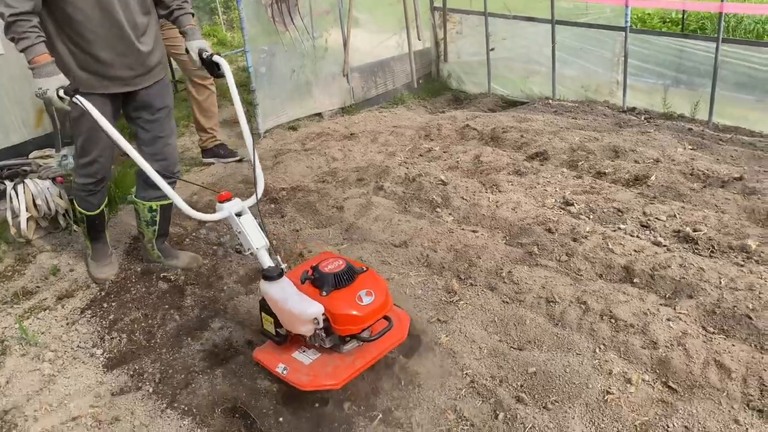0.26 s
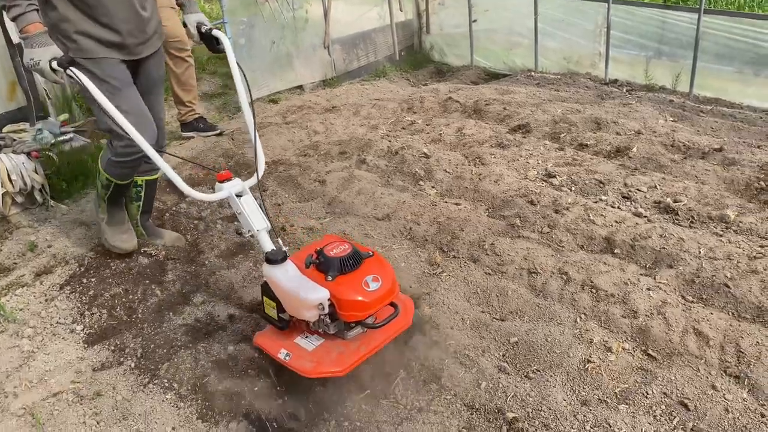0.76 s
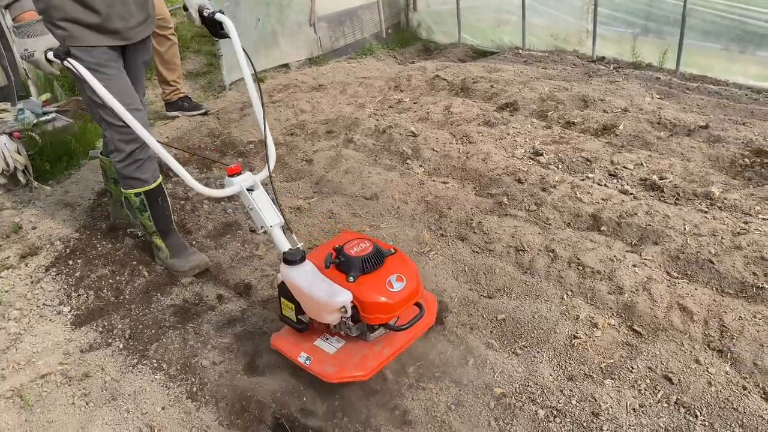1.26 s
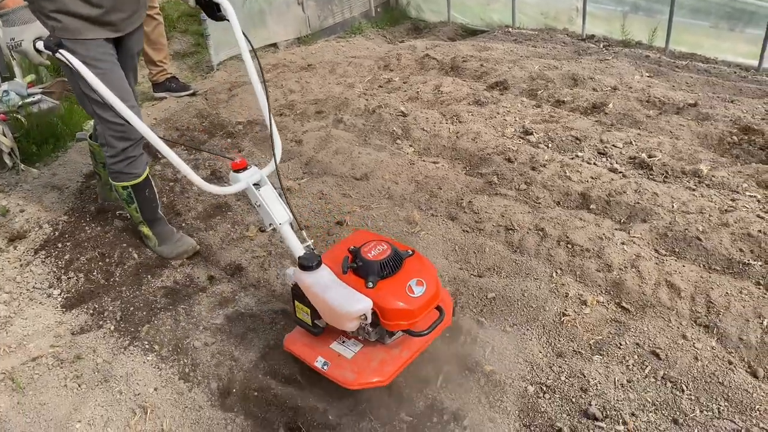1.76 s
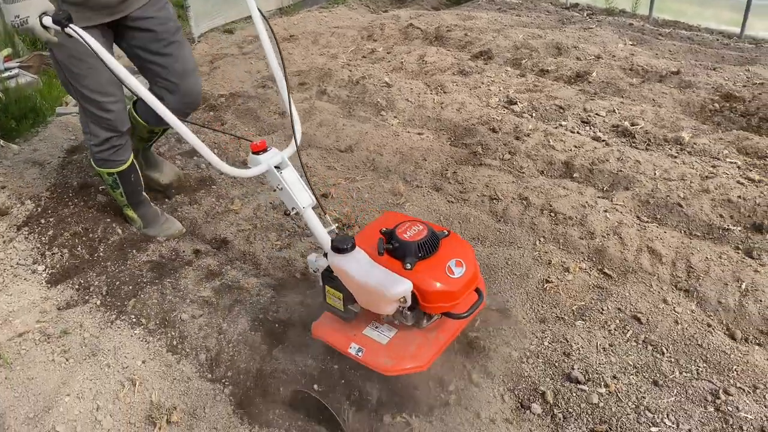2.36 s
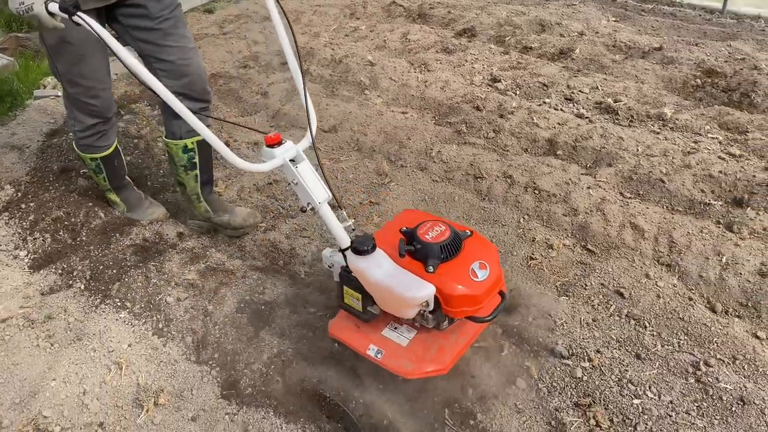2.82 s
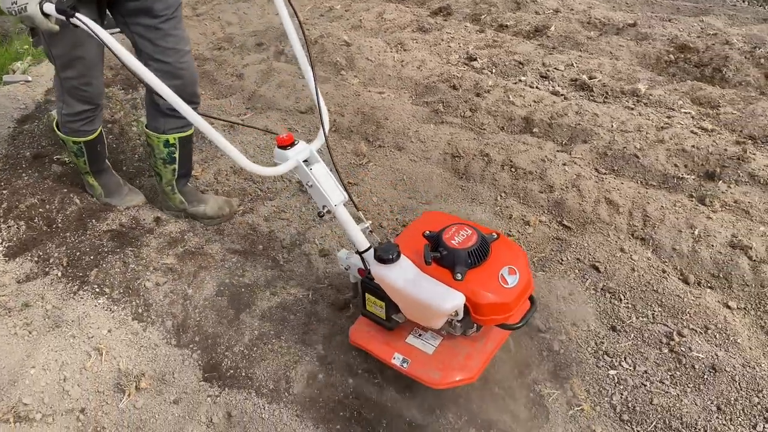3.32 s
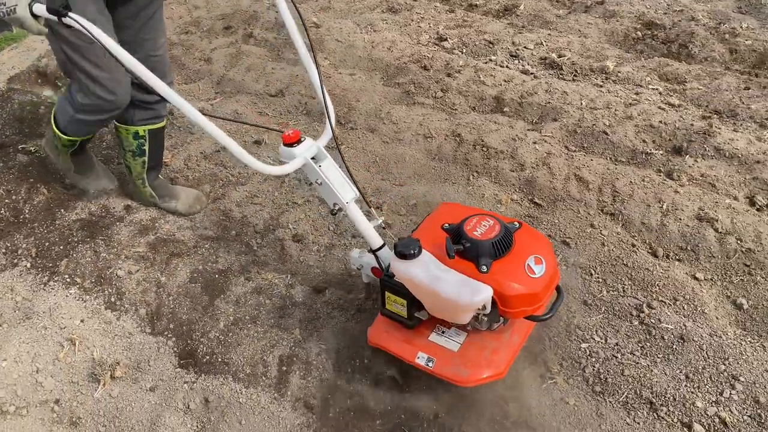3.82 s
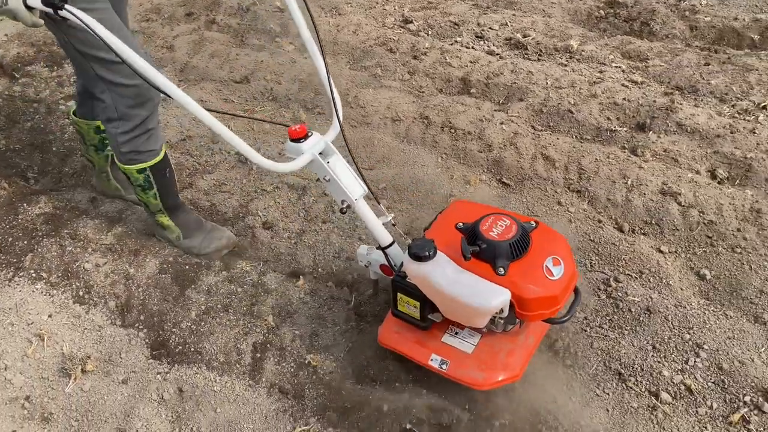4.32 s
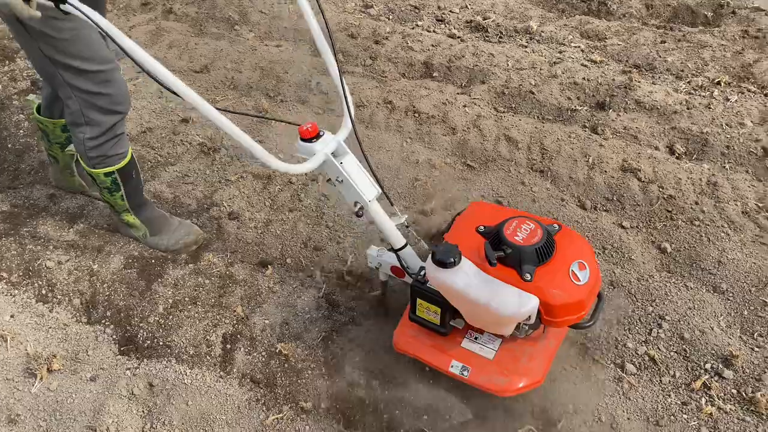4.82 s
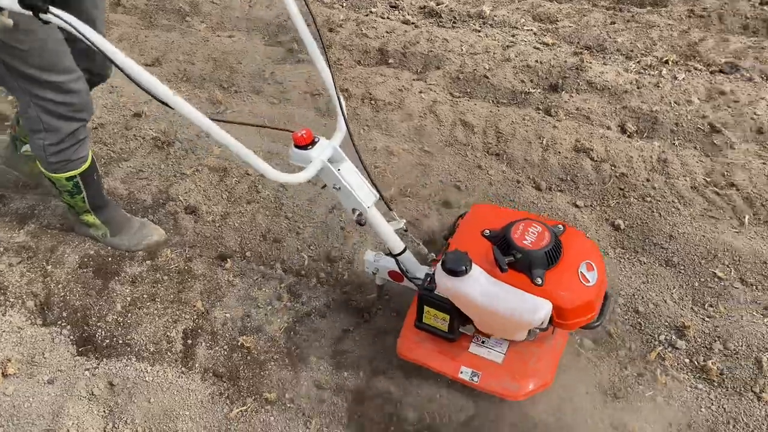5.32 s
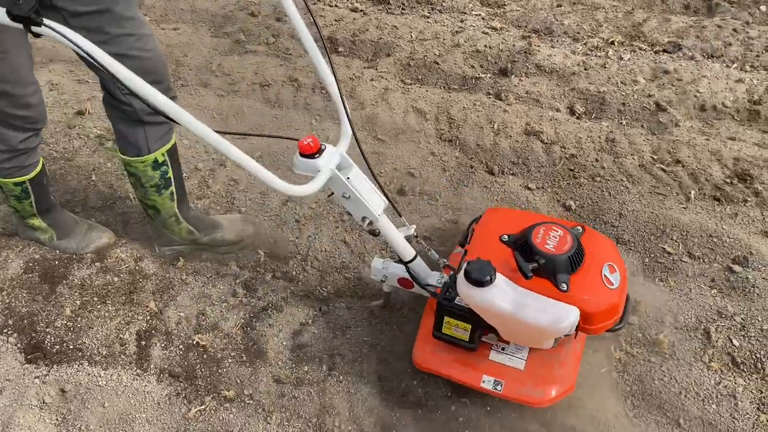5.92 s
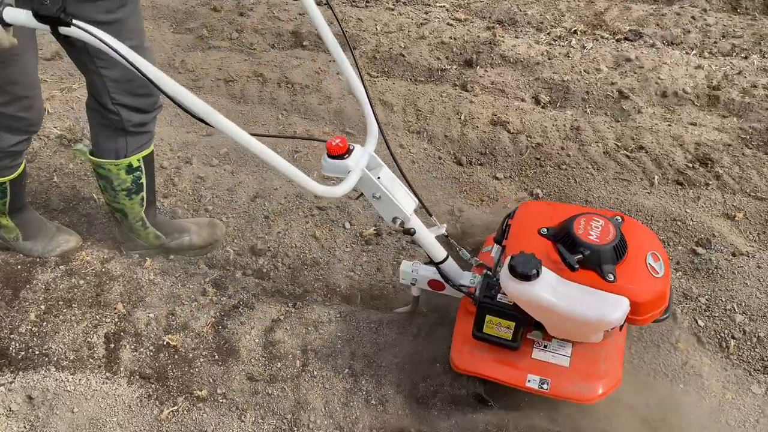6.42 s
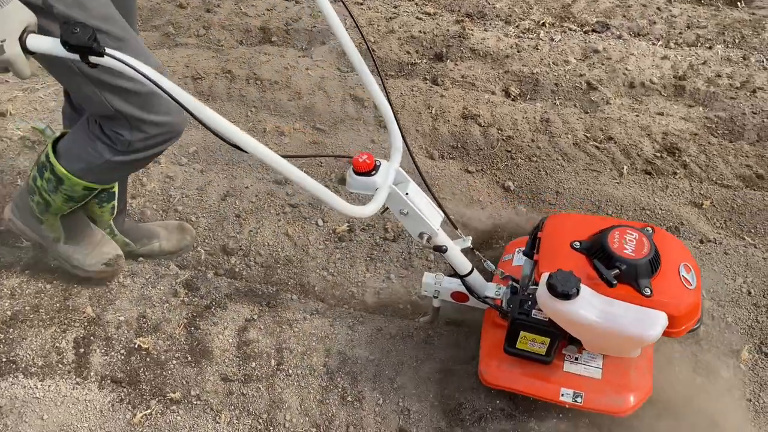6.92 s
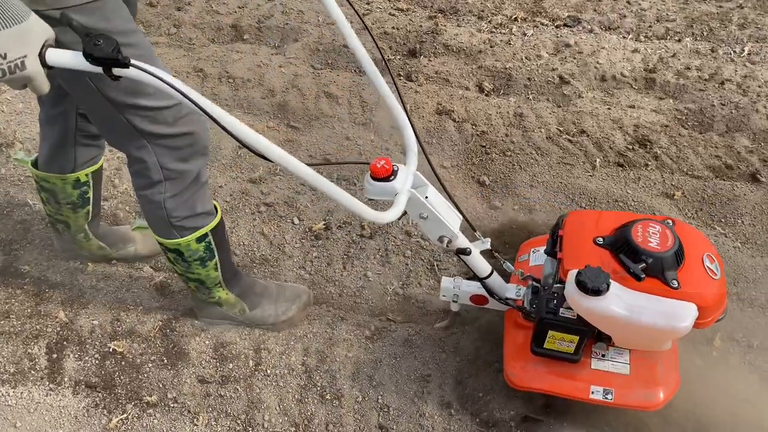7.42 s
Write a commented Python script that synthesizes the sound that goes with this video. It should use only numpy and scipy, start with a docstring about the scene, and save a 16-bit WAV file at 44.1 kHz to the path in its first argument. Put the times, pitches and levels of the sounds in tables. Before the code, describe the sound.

From 0 s to the end at about 7.7 s, a small single-cylinder petrol engine runs hard, close to the microphone, with no start or stop. Around 39 firings a second fuse into a rough, low buzzing drone that wavers slightly under load. A bassy intake throb, barking exhaust, clattering casing, ticking valves and buzzing panels mix with a steady fan whine and the grainy hiss of dry soil striking the guard. Near 0.6 and 0.7 s a tine rings faintly and high on a stone. Gear whine strengthens from about 2.5 s and fluctuates up to 6 s, then eases. A short grit rasp comes near 2.65 s, with stronger ones around 5.4, 5.9, 6.2 and 6.6 s. As the machine turns side-on, the exhaust becomes more forward and harsh, its loudest peaks slightly rounded. The echo is short and faint.

```python
"""A mini cultivator tills dry soil in a greenhouse, its four-stroke single firing about 39 times a second.
From the start the exhaust barks, the intake booms, valves and gears clatter, the fan whines and crumbs
hit the guard, each a shaft-locked oscillation or filtered pulse train or noise. Before 1 s a tine rings twice
on a stone. The machine turns from front to side, grit rasps briefly along the guard near 2.65 s and several
times between 5 and 7 s, and the exhaust swings towards the close microphone, which rounds off the tallest peaks."""
import sys
import numpy as np
from scipy import signal
from scipy.fft import rfft, irfft, next_fast_len
from scipy.io import wavfile
from scipy.ndimage import map_coordinates

SR = 44100
rng = np.random.default_rng(int(sys.argv[2]) if len(sys.argv) > 2 else 0)


def put_to_file(sound):
    """Save the sound as 16-bit audio at rate SR, in the file named by the first command-line argument."""
    columns = np.atleast_2d(sound).T  # one column per channel
    safe = np.clip(columns, -1, 1)
    whole_steps = np.round(safe * 32767)
    wavfile.write(sys.argv[1], SR, whole_steps.astype(np.int16))


N = 338247

# Engine speed, as the tines load the engine when they bite: columns [t/s, firing rate/Hz]
ENGINE_SPEED = [(0.0, 39.23), (0.2, 38.76), (0.36, 39.28), (0.4, 40.46), (0.48, 39.66), (0.56, 37.4),
                (0.88, 40.16), (1.0, 38.3), (1.4, 40.46), (1.56, 38.46), (1.64, 39.25), (1.68, 38.4),
                (1.76, 39.15), (1.92, 38.4), (2.0, 39.25), (2.08, 37.62), (2.24, 38.13), (2.32, 39.58),
                (2.44, 40.47), (2.48, 39.56), (2.56, 39.91), (2.64, 38.89), (2.68, 39.66), (2.8, 39.23),
                (2.88, 38.17), (2.92, 39.14), (3.0, 38.36), (3.2, 39.83), (3.4, 38.6), (3.56, 38.6),
                (3.6, 38.99), (3.8, 38.94), (3.88, 40.0), (4.08, 39.72), (4.2, 38.09), (4.48, 39.86),
                (4.68, 38.75), (4.8, 38.89), (4.88, 39.77), (5.0, 38.42), (5.16, 38.61), (5.2, 37.97),
                (5.24, 39.39), (5.36, 40.15), (5.52, 38.66), (5.6, 39.27), (5.64, 38.28), (5.92, 39.87),
                (6.0, 38.21), (6.04, 36.25), (6.16, 39.74), (6.52, 40.65), (6.68, 38.81), (6.92, 39.28),
                (7.0, 38.05), (7.16, 39.56), (7.32, 38.4), (7.42, 38.5), (7.52, 39.7), (7.67, 38.8)]
# Point of view as the machine passes and turns its side: columns [t/s, view (0 front, 1 side)]
VIEW_PATH = [(0, 0.12), (1.5, 0.22), (2.2, 0.41), (3.0, 0.56), (4.6, 0.74), (6.4, 0.92), (7.67, 0.88)]
# Gears sing out as they take up load and relax when the tines run free: columns [t/s, level/dB before trim]
GEAR_LEVEL = [(0, -23), (.3, -24), (.8, -27), (1.2, -24), (1.45, -19), (1.7, -20), (2.4, -17.5),
              (2.75, -14.5), (3.7, -13), (3.95, -15.5), (4.22, -10), (4.43, -20.5), (4.65, -12.5),
              (4.92, -18), (5.05, -13.5), (5.33, -15.5), (5.45, -13.5), (5.7, -12.5), (5.85, -17),
              (6.0, -14), (6.1, -19.5), (6.27, -16), (6.45, -24), (6.68, -20), (7.3, -18.5), (7.67, -22.5)]
# Orders of the intake boom tied to another: columns [order, order followed, level against it/dB]
THROB_PARTNERS = [(1, 2, -20), (3, 2, -7), (6, 5, -3)]

# Spectral envelopes of the radiating bodies (each output is rescaled): columns [f/Hz, level/dB]
CASE_SPECTRUM = [(50, -6.5), (200, -1), (330, 3.5), (600, -1), (1080, -3.5), (1550, -1), (2150, -1.5),
                 (2500, -9.5), (3200, -6), (4400, -10.5), (5800, -16), (9000, -35)]
GEAR_SPECTRUM = [(1000, -60.5), (1580, -25.5), (1725, 5.5), (1830, 11), (1930, 9.5), (2080, -34),
                 (3000, -41.5)]
VALVE_SPECTRUM = [(3000, -30), (5800, -13), (6300, -3), (6700, 0), (7200, 0), (7700, -5), (8300, -10),
                  (16000, -22)]
SOIL_SPECTRUM = [(300, -9), (1200, -1.5), (3000, 2), (5800, 0), (8000, 1), (11000, 2), (15800, -4.5)]
CYLINDER_SPECTRUM = [(300, -18.5), (650, -12), (850, -4), (930, 0), (1050, -5), (1200, -2.5), (1450, -7),
                     (1650, -7.5), (2200, -10.5), (3000, -17.5), (8000, -56)]
GUARD_SPECTRUM = [(1000, -30), (1900, -19), (2150, 0.5), (2330, 0.5), (2520, -5), (2800, -9), (4000, -24),
                  (8000, -36)]
MUFFLER_SPECTRUM = [(150, -17), (260, -1.5), (312, 1.5), (352, 3), (390, 2), (430, -2.5), (500, -2.5),
                    (560, -6.5), (660, -16.5), (700, 4), (740, 0.5), (790, -9), (2500, -31), (8000, -60)]
OUTLET_SPECTRUM = [(150, -2.5), (300, -16.5), (350, 1.5), (390, -4), (430, 4), (470, 0.5), (510, 1.5),
                   (550, 0.5), (590, 10.5), (628, 6), (665, 0), (703, 10), (742, 1), (780, 2), (830, -5),
                   (930, -11), (1150, -37), (2500, -41), (8000, -77)]

# Blows on crankcase, gears and valves, and piston slaps on the bore at each of its four turns:
# columns [place in the engine cycle (0-1), relative level/dB]
CASE_KNOCKS = [(.05, 4.5), (0.151, 2), (.24, -1), (.32, 3), (0.671, 4.5), (.86, 6.5)]
GEAR_MESHES = [(.28, 6.7), (0.49, 1), (0.731, 8.6), (.89, 2.1)]
VALVE_TAPS = [(.35, -8), (.675, 0), (.8, -9)]
PISTON_SLAPS = [(.165, 4.5), (0.415, 4), (0.671, -4), (0.922, 4)]
# A firing leaves as a puff and a weaker afterpuff: columns [place in the cycle (0-1), relative level/dB]
OUTLET_PUFFS = [(.034, 0), (.342, -6)]
SHELL_PUFFS = [(.034, 0), (.284, -5)]

# Grit grinding along the guard: columns [middle t/s, length t/s, level/dB]
GRIT_SCRAPES = [(2.653, 0.18, -31), (5.44, 0.29, -24.5), (5.948, 0.16, -25), (6.237, 0.16, -24),
                (6.605, 0.3, -25)]
# A tine ringing as it drags past a stone: columns [middle t/s, length t/s, f/Hz, level/dB]
TINE_RINGS = [(.6, .06, 4200, -34), (.72, 0.055, 4190, -32.5)]
# Sheet panels of guard and cover:
# columns [f/Hz, width/Hz, relative level/dB from the front, from halfway round, from the side]
SHEET_PANELS = [(933, 160, -5, -7.5, -24), (1365, 79, -6, -24, -14), (2352, 170, -10, -15, -6),
                (2680, 185, -22, -7.5, -10), (3655, 280, -16, -17, -9), (4740, 310, -7, -17, -15),
                (6420, 550, -3, -12, -20)]
# Casing partials: columns [order of the firing rate, rounded in use;
# then level/dB before trim at four evenly spaced views from front to side]
CASING_HUMS = [(7, -33, -42, -52, -54), (22, -36, -40, -44, -29), (30, -37, -26, -34, -55),
               (33, -34, -31.5, -34, -43), (37, -35, -35, -40, -54), (40, -55, -62, -45, -42),
               (44, -52, -46, -28, -49), (48, -46, -30.5, -32.5, -33), (50, -53, -26, -42, -52),
               (52, -54, -44, -41, -50), (60, -53, -47, -47, -33), (63.55, -49, -34, -40, -47),
               (76.5, -56, -50, -42, -40), (87.2, -62, -53, -48, -54), (92.8, -51, -45, -44, -38),
               (94, -51, -52, -48, -49), (97.3, -54, -46, -43, -41)]

# Radiation of each part: columns [level/dB before trim, at evenly spaced views from front to side]
THROB_2_LEVELS = (-15, -13.5, -18)
THROB_4_LEVELS = (-32, -42, -28.5, -23, -26.5)
THROB_5_LEVELS = (-13.5, -15.5, -18.5)
SHELL_LEVELS = (-24.5, -23.5, -25, -27, -41)
OUTLET_LEVELS = (-19, -31, -21, -14.5, -13)
FAN_LEVELS = (-32, -19.5, -23, -29, -27)
SLAP_LEVELS = (-28, -24, -28.5, -34, -33)
CLATTER_LEVELS = (-23, -19, -18.5, -18.5, -22.5)
TAPPET_LEVELS = (-26, -22.5, -23.5, -25.5, -27)
SPRAY_LEVELS = (-26.5, -24.5, -28)
# Clatter width, wide in front: columns [side over mid, at evenly spaced views from front to side]
CLATTER_WIDTH = (0.99, 0.57, 0.81)

LOW_HZ, TOP_HZ = 36, 15850  # band limits of the microphone
PANEL_TOP_HZ = 6400  # the sheet panels ring little above this
CRUISE_HZ = 39  # firings per second under an average load
# level change/dB for each firing per second above cruise: the fan blows harder, the valves tap louder
FAN_DB_PER_HZ, CLATTER_DB_PER_HZ, TAPPET_DB_PER_HZ = 1.2, 0.24, 1
SPEED_WANDER = .002  # cycles by which uneven soil pushes the shaft ahead or back
RING_SHARE = .38  # share of the metal's ring power that repeats in each cycle
RING_DRIFT = .6  # radians per second by which the repeated ring changes as the machine turns
RING_JITTER = .0004  # cycles by which it comes early or late


def amp(db):
    """Decibel law: a level becomes an amplitude ratio."""
    return 10 ** (np.asarray(db) / 20)


def unit(x):
    """Normalization of mean power: the signal at rms 1."""
    return x / np.sqrt(np.mean(x ** 2) + 1e-20)


def along(points, hz):
    """Logarithmic interpolation: (f/Hz, value) points read on a log frequency axis."""
    f, value = np.transpose(points)
    return np.interp(np.log(hz + 1), np.log(f), value)


def curves(rows):
    """Linear interpolation in time: one value per sample for each column after t/s."""
    s, *columns = np.transpose(rows)
    return [np.interp(np.arange(N) / SR, s, column) for column in columns]


def wobble(rate):
    """Band-limited random modulation: a smooth spline through `rate` random knots a second."""
    coarse = np.linspace(0, N, N // 16)
    knots = rng.standard_normal(int(N * rate / SR) + 4)
    return np.interp(np.arange(N), coarse, map_coordinates(knots, [coarse * rate / SR]))


def swell(s, length, db):
    """Gaussian envelope: a level that rises and fades round its middle."""
    return amp(db) * np.exp(-2 * ((np.arange(N) / SR - s) / length) ** 2)


def heard(values, view):
    """Directivity: a part's level or width from the present point of view."""
    return np.interp(view, np.linspace(0, 1, len(values)), values)


def placed(pair, width, pan_db):
    """Mid-side stereophony: two unrelated signals become a pair; width is side against mid."""
    mid, side = pair
    return np.array([mid + width * side, mid - width * side]) * amp([[pan_db / 2], [-pan_db / 2]])


def hiss():
    """Uncorrelated excitation: two unrelated white noises."""
    return rng.standard_normal((2, N))


def coloured(x, spectrum):
    """Minimum-phase filtering: x through the causal body with this spectrum, at rms 1."""
    m = 2 * next_fast_len(N // 2 + SR // 8)
    cepstrum = irfft(np.log(amp(along(spectrum, np.fft.rfftfreq(m, 1 / SR)))))
    # folding the cepstrum onto positive time makes the response causal
    cepstrum[1:m // 2] *= 2
    cepstrum[m // 2 + 1:] = 0
    response = np.exp(rfft(cepstrum))
    return unit(irfft(rfft(x, m) * response, m)[..., :N])


def resonance(x, hz, width_hz):
    """Single-mode resonance: x through one ringing mode, at rms 1."""
    return unit(signal.lfilter(*signal.iirpeak(hz, hz / width_hz, fs=SR), x))


def blows(turn, pattern, scatter_db, jitter):
    """Periodic impulsive excitation: one impulse per cycle at each place; jitter is a share of the cycle."""
    out, cycles = np.zeros(N), np.arange(int(turn[-1]) + 1)
    for place, db in pattern:
        luck = rng.standard_normal((SR // 100, 2))[:len(cycles)]
        moments = cycles + place + jitter * luck[:, 0]
        at = np.interp(moments, turn, np.arange(N), left=-1, right=-1)
        inside = at >= 0
        out += np.bincount(at[inside].astype(int), amp(db + scatter_db * luck[inside, 1]), N)
    return out


def rattle(hits, grain, t60, bed):
    """Energy decay: each blow sets off a swelling, dying burst of the grain, over a steady bed."""
    t = np.arange(SR // 16) / SR
    burst = amp(-60 * t / t60) * (1 - np.exp(-t / .0003))
    power = np.abs(signal.oaconvolve(hits ** 2, burst ** 2)[:N])
    return unit(np.sqrt(power / power.mean() + bed) * grain)


def ringing(turn):
    """Dense modal ring: noise that repeats with the engine cycle, mixed with loose noise."""
    size = int(SR / CRUISE_HZ)
    place = (turn + RING_JITTER * wobble(60)) % 1 * size
    rings = rng.standard_normal((4, size))
    looped = [np.interp(place, np.arange(size), ring) for ring in rings]
    first, second = np.reshape(looped, (2, 2, N))
    angle = RING_DRIFT * np.arange(N) / SR
    repeated = unit(np.cos(angle) * first + np.sin(angle) * second)
    return np.sqrt(RING_SHARE) * repeated + np.sqrt(1 - RING_SHARE) * hiss()


def greenhouse(x, t60, wet_db):
    """Reverberation: film walls and soft ground return a short, weak echo."""
    t = np.arange(SR // 3) / SR
    tail = rng.standard_normal((2, len(t))) * amp(-60 * t / t60) * (t > .006)
    tail /= np.linalg.norm(tail[0])
    above_bass = signal.sosfilt(signal.butter(2, 350, "high", fs=SR, output="sos"), x)
    return x + amp(wet_db) * signal.fftconvolve(above_bass, tail, axes=1)[:, :N]


def soil(turn, level_db):
    """Random impact noise: dry crumbs spray the guard in clumps, over the rush of the cooling air."""
    density = 1500 * amp(2.5 * wobble(15)) / SR  # chance of a crumb in each sample
    size_db = 2 * np.minimum(rng.exponential(size=N), 3)
    crumbs = (rng.random(N) < density) * amp(size_db)
    surge = amp(.8 * np.cos(4 * np.pi * (turn - .8)) + .9 * wobble(20) + .5 * wobble(7))
    spray = coloured(rattle(crumbs, hiss(), t60=.006, bed=1.2) * surge, SOIL_SPECTRUM)
    return amp(level_db - 2) * placed(spray, width=.9, pan_db=.3)


def scrapes(turn):
    """Friction excitation: grit on the shaking guard buzzes with the engine; a tine rings on a stone."""
    shaking = blows(turn, CASE_KNOCKS, scatter_db=2, jitter=.001)
    rasp = coloured(rattle(shaking, ringing(turn), t60=.014, bed=.35), GUARD_SPECTRUM)
    tine = np.zeros(N)
    for s, length, hz, db in TINE_RINGS:
        once = resonance(rng.standard_normal(N), hz, 50)
        tine += swell(s, length, db) * resonance(once, hz, 50)
    pressure = sum(swell(*row) for row in GRIT_SCRAPES)
    return pressure * placed(rasp, width=.4, pan_db=0) + tine


def fan(turn, level_db):
    """Blade-passing tone: sixteen vanes pass twice a cycle; the shaft surges and the air flutters."""
    surge = .001 * np.sin(2 * np.pi * turn) + .003 * wobble(45) + .0012 * wobble(160)
    vanes = np.sin(2 * np.pi * 32 * (turn + surge))
    # slightly stronger in the second channel
    return amp(level_db - 3.5 + 1.04 * wobble(40)) * unit(vanes) * amp([[-.7], [.7]])


def hums(turn, view):
    """Forced vibration: casing partials glide with the shaft, swell once a revolution and flutter singly."""
    shaft = turn + .0012 * wobble(40)
    tone = np.zeros(N)
    for order, *levels_db in CASING_HUMS:
        phase = round(order) * shaft + rng.random() + .085 * wobble(28)
        level = amp(heard(levels_db, view) + 1.8 * wobble(14))
        tone += level * np.sin(2 * np.pi * phase)
    strokes = amp(4 * np.cos(4 * np.pi * (turn - .83)))
    return np.sqrt(2) * amp(-0.3) * tone * unit(strokes)


def gear_whine(turn, level_db):
    """Tooth-meshing tone: the pinion sings 47 times a cycle, swells twice a cycle and flutters in backlash."""
    surge = .0013 * np.sin(2 * np.pi * turn) + .0028 * wobble(38) + .001 * wobble(110)
    teeth = np.sin(2 * np.pi * 47 * (turn + surge))
    once_db = 2.3 * np.cos(2 * np.pi * (turn - .85))
    twice_db = 10.5 * np.cos(4 * np.pi * (turn - .83))
    load = amp(once_db + twice_db + 2.8 * wobble(50))
    return amp(level_db - 8.0) * unit(teeth * load) * amp([[-.8], [.8]])


def panels(turn, view):
    """Plate resonance and directivity: knocks shake the sheet panels, which face the listener in turn."""
    ring = np.zeros((2, N))
    hits = unit(blows(turn, CASE_KNOCKS, scatter_db=2, jitter=.0008))
    shake = 8.2 * ringing(turn) + np.array([hits, np.zeros(N)])
    for hz, width, *levels_db in SHEET_PANELS:
        flutter_db = 2.2 * wobble(7)
        ring += resonance(shake, hz, width) * amp(heard(levels_db, view) + flutter_db)
    ring = signal.sosfilt(signal.butter(2, PANEL_TOP_HZ, fs=SR, output="sos"), ring)
    return placed(ring, width=0.053, pan_db=2.0)


def metalwork(turn, pattern, spectrum, clean, jitter, t60, bed, width, pan_db):
    """Struck-body radiation: shaft-tied blows ring a metal part, partly alike each cycle, partly loose."""
    hits = unit(blows(turn, pattern, scatter_db=1, jitter=jitter))
    loose = rattle(hits, ringing(turn), t60, bed)
    ring = coloured(loose + clean * np.array([hits, np.zeros(N)]), spectrum)
    return placed(ring / np.std(ring[0]), width, pan_db)


def throb(turn, order_db):
    """Harmonic synthesis: each intake stroke booms in the airbox; its orders are spread in phase."""
    level = dict(zip((2, 4, 5), order_db))
    for order, leader, db in THROB_PARTNERS:
        level[round(order)] = level[round(leader)] + db
    stroke = turn - .4 + .002 * wobble(35)
    tone = np.zeros(N)
    for order, db in level.items():
        lag = 1.6 * np.exp(-(order - 3) ** 2)  # radians: the airbox resonance delays the third order most
        phase = 2 * np.pi * order * stroke - lag + 0.092 * wobble(30)
        tone += amp(db + 0.48 * wobble(35)) * np.cos(phase)
    return np.sqrt(2) * amp(-1.5) * tone * amp([[1.8], [-2.3]])


def gas_pulses(turn, pattern, spectrum, rough, scatter_db, jitter):
    """Pulse-excited cavity: pressure pulses, each with a little turbulence behind it, ring a chamber."""
    pulses = unit(blows(turn, pattern, scatter_db, jitter))
    turbulence = rattle(pulses, hiss(), t60=.02, bed=.6)
    return coloured(pulses + rough * turbulence, spectrum)


def bark(turn, outlet_db, shell_db):
    """Blowdown: as the exhaust valve opens, the outlet barks and the shell rings lower, more to the left."""
    outlet = -gas_pulses(turn, OUTLET_PUFFS, OUTLET_SPECTRUM, rough=.13, scatter_db=.8, jitter=.0015)
    shell = -gas_pulses(turn, SHELL_PUFFS, MUFFLER_SPECTRUM, rough=.055, scatter_db=.9, jitter=.002)
    return amp(outlet_db - 3.0) * outlet + amp(shell_db + 1.5) * shell * amp([[2.6], [-3.2]])


def scene():
    """Superposition: engine speed and point of view drive the parts of the machine, which add up."""
    speed, view = curves(ENGINE_SPEED)[0], curves(VIEW_PATH)[0]
    turn = .919 + np.cumsum(speed) / SR  # engine cycles so far
    turn = turn + SPEED_WANDER * wobble(9)
    racing = speed - CRUISE_HZ
    fan_db = heard(FAN_LEVELS, view) + FAN_DB_PER_HZ * racing
    gear_db = curves(GEAR_LEVEL)[0]
    clatter_db = heard(CLATTER_LEVELS, view) + CLATTER_DB_PER_HZ * racing
    tappet_db = heard(TAPPET_LEVELS, view) + TAPPET_DB_PER_HZ * racing

    tilling = soil(turn, heard(SPRAY_LEVELS, view)) + scrapes(turn)

    case = metalwork(turn, CASE_KNOCKS, CASE_SPECTRUM, clean=.2, jitter=.0006, t60=.026, bed=.9,
                     width=heard(CLATTER_WIDTH, view), pan_db=1.5)
    gears = metalwork(turn, GEAR_MESHES, GEAR_SPECTRUM, clean=0.3, jitter=0.00097, t60=0.012, bed=0.085,
                      width=0.092, pan_db=-2.5)
    valves = metalwork(turn, VALVE_TAPS, VALVE_SPECTRUM, clean=.08, jitter=.005, t60=.013, bed=1.2,
                       width=.25, pan_db=2)
    piston = metalwork(turn, PISTON_SLAPS, CYLINDER_SPECTRUM, clean=1.5, jitter=.0013, t60=.014, bed=.3,
                       width=.5, pan_db=-1)
    load_db = 0.71 * wobble(12)  # the tines bite unevenly
    metal = amp(clatter_db + load_db) * case
    metal = metal + amp(gear_db - 10.0) * gears
    metal = metal + amp(tappet_db - 6.0) * valves
    metal = metal + amp(heard(SLAP_LEVELS, view)) * piston
    metal = metal + amp(clatter_db - 2.0) * panels(turn, view)

    whines = fan(turn, fan_db) + gear_whine(turn, gear_db) + hums(turn, view)
    exhaust = bark(turn, heard(OUTLET_LEVELS, view), heard(SHELL_LEVELS, view))
    order_db = [heard(levels, view) for levels in (THROB_2_LEVELS, THROB_4_LEVELS, THROB_5_LEVELS)]
    intake = throb(turn, order_db)  # stays outside the echo
    return intake + greenhouse(tilling + whines + metal + exhaust, t60=.2, wet_db=-15)


def record(dry):
    """Transducer limits: no steady pressure, the tallest peaks rounded off, nothing above the band limit."""
    m = next_fast_len(N + SR // 4)
    hz = np.fft.rfftfreq(m, 1 / SR)
    low_cut = np.clip(hz / LOW_HZ, 0, 1) ** 2
    pressure = irfft(rfft(dry, m) * low_cut, m)[:, :N]
    held = pressure / (1 + np.abs(pressure / .99) ** 12) ** (1 / 12)
    return irfft(rfft(held, m) * (hz < TOP_HZ), m)[:, :N]


dry = scene()
out = record(dry)
put_to_file(out)
```